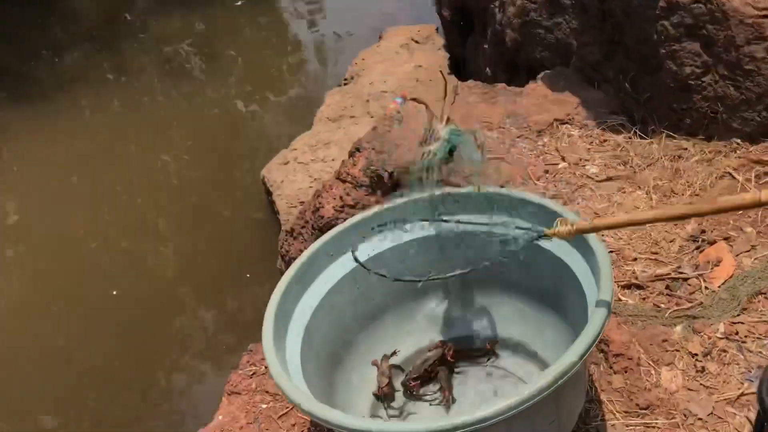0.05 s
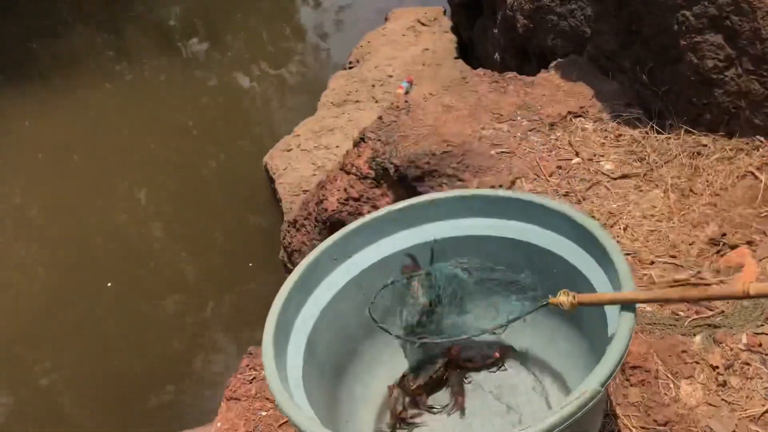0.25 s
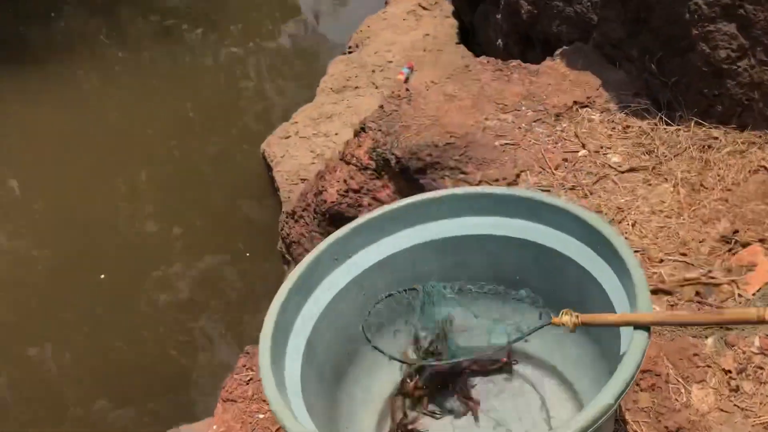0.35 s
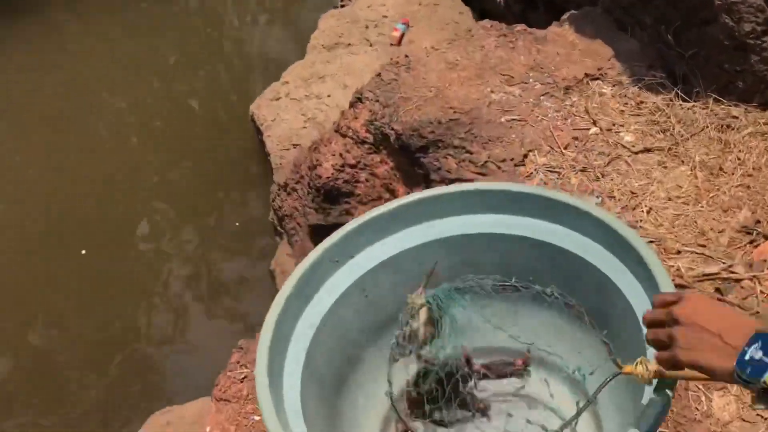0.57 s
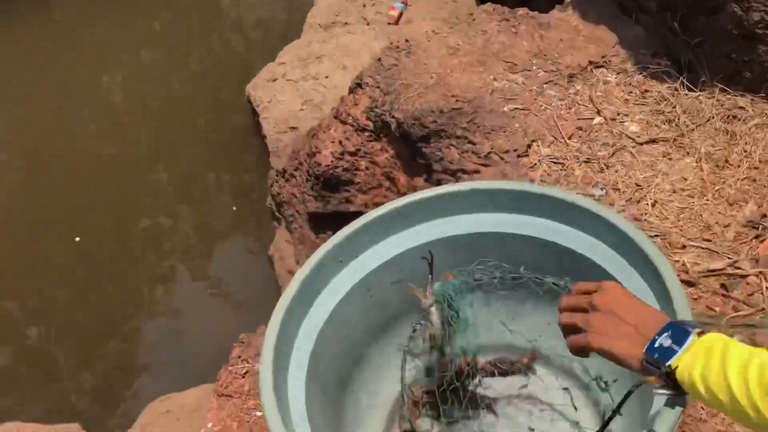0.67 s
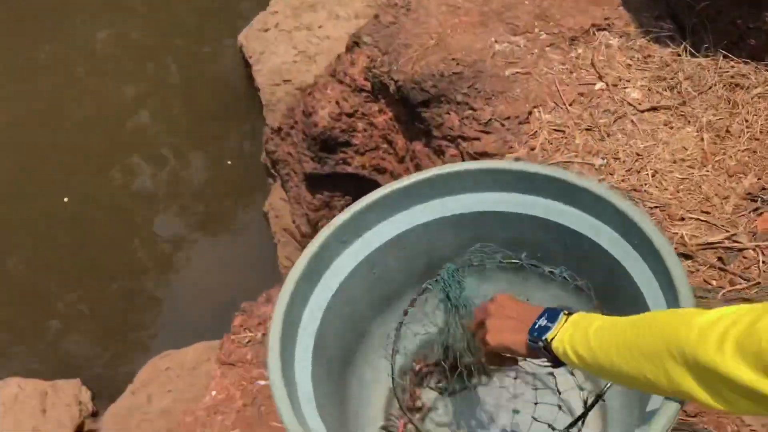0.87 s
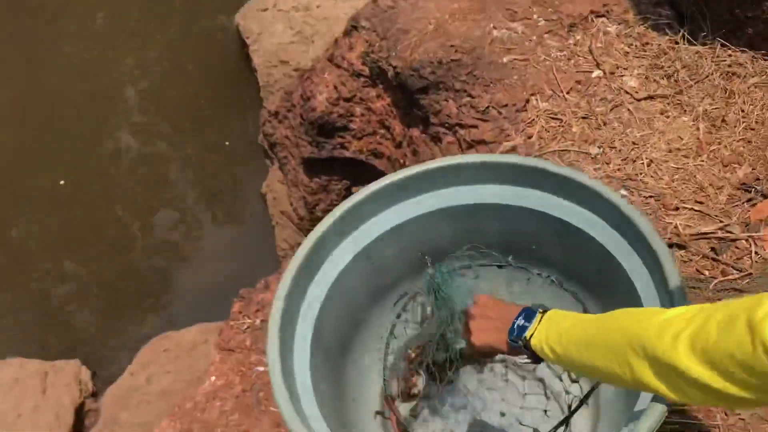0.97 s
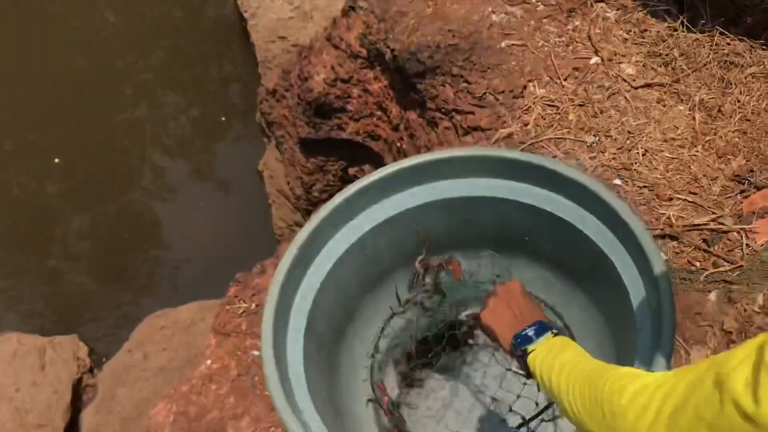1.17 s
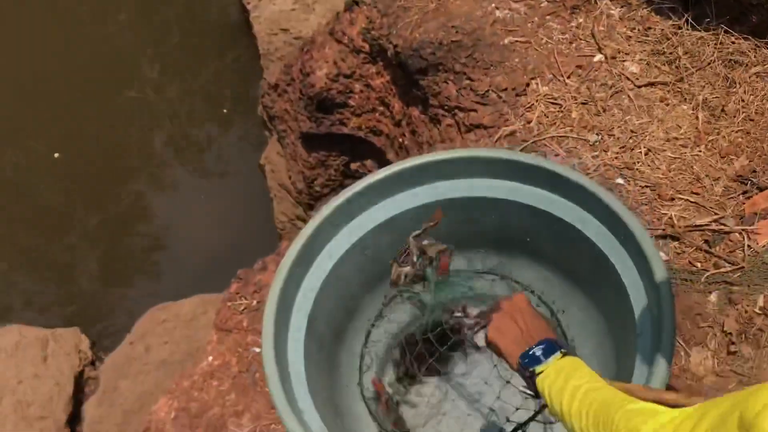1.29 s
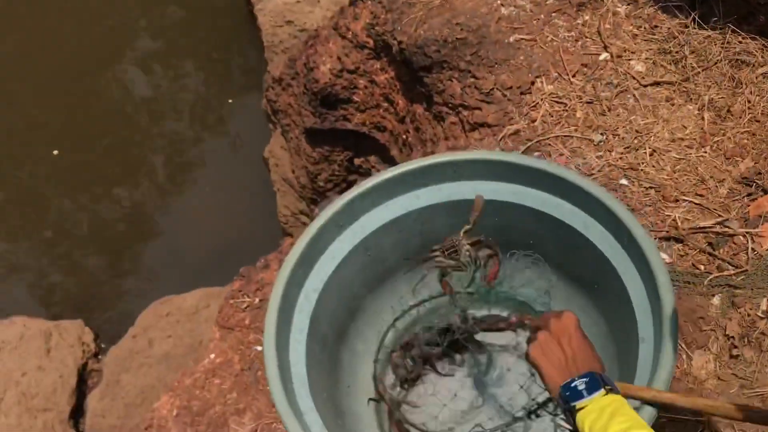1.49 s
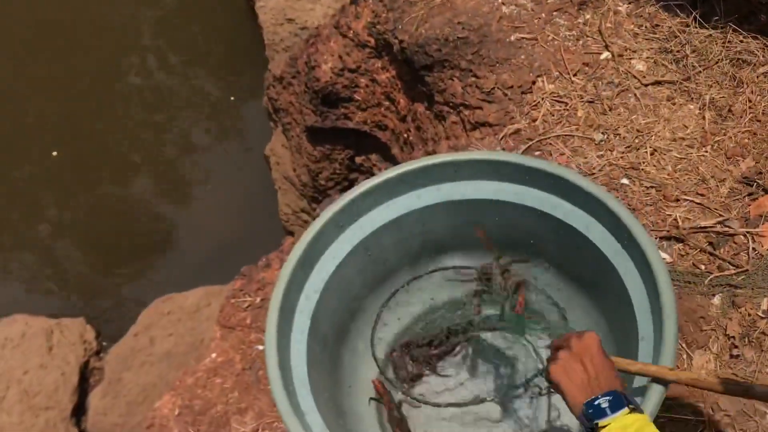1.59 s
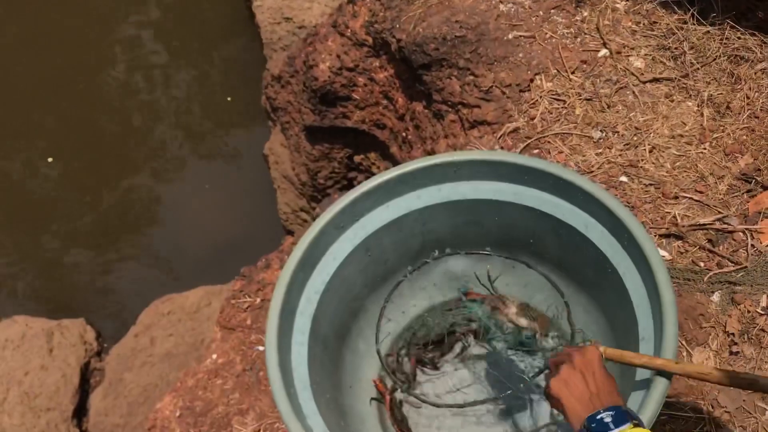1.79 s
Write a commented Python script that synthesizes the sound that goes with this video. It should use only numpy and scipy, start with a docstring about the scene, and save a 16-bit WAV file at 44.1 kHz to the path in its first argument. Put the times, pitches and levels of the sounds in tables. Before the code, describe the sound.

A net of crabs knocks into a plastic tub, then rattles as it is shaken.

```python
"""A quiet outdoor wash, a thin hiss of insects and a low hum lie over a creek bank throughout.
At 0.2 s a wire-hooped net of crabs drops into a plastic tub: the impacts excite the modes of floor,
wall and hoop. As these decay, shells and claws click and the mesh rustles by friction.
From about 1.1 s a hand shakes the crabs loose, with more knocks, clicks and short scrapes."""
import sys
import numpy as np
from scipy import signal
from scipy.fft import rfft, irfft
from scipy.io import wavfile
from scipy.ndimage import uniform_filter1d

SR = 44100
rng = np.random.default_rng(int(sys.argv[2]) if len(sys.argv) > 2 else 0)


def store_wav(level_fs):
    """Save 16-bit WAV to argv[1]."""
    pcm = np.round(np.clip(np.atleast_2d(level_fs), -1, 1) * 32767)
    wavfile.write(sys.argv[1], SR, pcm.T.astype(np.int16))


N = 81585
T = np.arange(SR // 2) / SR  # time within one event, t/s

# Spectrum of the outdoor wash: f/Hz, relative level/dB
WASH_SPECTRUM = [(20, -38), (35, -11), (55, -1), (100, 1), (170, -2), (280, -2.5), (420, -23), (640, -6),
                 (900, -21), (1800, -19.5), (3500, -17.5), (5800, -17), (9000, -20.5), (12000, -25),
                 (16000, -24)]
# Envelope of the low hum: t/s, level/dB
HUM_ENVELOPE = [(0, -60.5), (.5, -56), (.9, -55.5), (1.2, -59), (1.85, -56.5)]
# Envelope of the rubbing of mesh and legs: t/s, level/dB
RUSTLE_ENVELOPE = [(0, -55.5), (.14, -68), (.18, -49.5), (.23, -40), (.33, -42.5), (.40, -53.5),
                   (.47, -51.5), (.60, -53.5), (.68, -55.5), (.88, -60.5), (1.05, -60.5), (1.08, -50),
                   (1.11, -52), (1.15, -52.5), (1.24, -51), (1.29, -42), (1.35, -43.5), (1.44, -47),
                   (1.48, -53), (1.62, -55.5), (1.69, -49.5), (1.73, -49.5), (1.85, -57)]
# Spectrum of that rubbing: f/Hz, relative level/dB
RUSTLE_SPECTRUM = [(30, -45), (100, -5), (300, 2), (900, 2), (1700, 0.5), (3000, -4.5), (5000, -7.5),
                   (8000, -14.5), (12000, -14.5), (16000, -8.5)]
# Short slides: t/s, duration/s, level/dB, centre f/Hz, width/octaves
SCRAPES = [(.148, 0.028, -48, 1590, 0.9), (0.661, 0.029, -51, 6960, 1.3), (.712, 0.049, -53.5, 1880, 1.24),
           (1.068, 0.024, -49.5, 2980, 1.3), (1.300, .016, -47, 11000, 0.81),
           (1.330, 0.039, -56, 7100, 2.1), (1.432, 0.022, -45.5, 5500, 0.65),
           (1.515, 0.057, -53, 1070, 0.37), (1.625, 0.023, -56.5, 3200, 0.16),
           (1.670, 0.042, -46, 2000, 0.79), (1.738, 0.023, -48, 1670, 0.36),
           (1.762, 0.011, -59, 13000, 0.44)]
# Claws, shells and snagging mesh: t/s, level/dB, snap T60/s, shell f/Hz, shell level re snap/dB
CLICKS = [(0.012, -45, 0.0049, 3630, 5.5), (0.156, -32, 0.028, 1770, -7), (0.285, -20, .008, 3780, -1),
          (.4298, -33.5, 0.016, 5260, -5.5), (0.466, -40, 0.019, 3520, -7.5), (.485, -51, .01, 3840, -3),
          (0.5242, -50.5, 0.0066, 3350, 14.5), (0.563, -40.5, .01, 5140, -11), (.591, -48, 0.012, 2000, -7),
          (0.66, -44.5, 0.036, 5130, -4), (.718, -52, .012, 2100, 0), (0.745, -44, 0.019, 2500, -5),
          (0.825, -47, 0.013, 2000, -5), (1.1303, -28.5, 0.01, 2450, -16), (1.1368, -28, 0.013, 5200, -33),
          (1.1466, -30, 0.024, 2300, -6), (1.174, -36, .008, 4460, -11), (1.219, -40.5, .012, 4300, -3),
          (1.271, -34.5, .012, 4200, -7), (1.2733, -17.5, 0.0076, 4070, -14),
          (1.2805, -30, 0.012, 4000, -9), (1.2965, -31.5, 0.01, 3480, -24), (1.304, -44, .025, 3000, -18),
          (1.3327, -39.5, 0.0072, 3200, 0), (1.399, -45.5, 0.0066, 4940, 8), (1.425, -45, 0.006, 2950, -9),
          (1.443, -37, 0.017, 4850, 6.5), (1.650, -40.5, .016, 5000, -3.5),
          (1.7031, -23.5, 0.0076, 3870, -7), (1.7074, -36.5, .014, 4640, -3),
          (1.7162, -37, 0.012, 3470, -19), (1.804, -45, 0.011, 2720, 6.5)]
# Spectrum of a click's snap: f/Hz, relative level/dB
SNAP_SPECTRUM = [(60, -48), (400, -20), (1500, -10), (4000, -5.5), (7500, -3), (8700, -6), (10200, 2),
                 (11600, -6), (13000, -0.5), (16000, 0.5)]
# Hard contacts of hoop and shells with the plastic: t/s, level/dB, crack T60/s
CLATTERS = [(.1979, -24.5, 0.015), (0.2015, -22.5, 0.038), (0.205, -19, 0.014), (.213, -47, 0.023),
            (0.2198, -22.5, 0.031), (.229, -32, .03), (0.237, -31.5, .04), (.256, -28, 0.028),
            (0.281, -24.5, 0.014), (0.2858, -24.5, 0.043), (0.3081, -29.5, 0.053), (0.323, -41, .04),
            (.340, -36.5, 0.084), (.349, -44, 0.029), (1.144, -29.5, 0.0052), (1.1593, -28.5, 0.035),
            (1.362, -39, 0.032), (1.3716, -32.5, 0.0091), (1.566, -42, 0.022)]
# Spectrum of the tub's dense upper modes: f/Hz, relative level/dB
CRACK_SPECTRUM = [(40, -47), (200, -14), (700, 4.5), (1300, 6), (2100, 3), (2800, -1.5), (3500, -2),
                  (4900, -4), (6000, -11), (10000, -17.5), (16000, -19.5)]
# Modes of the wire hoop, the tub's floor and its wall: f/Hz, relative level/dB, T60/s
HOOP_MODES = [(1630, 0, 0.06), (1758, -3.5, 0.061), (1888, -1.5, .08), (2060, -5, 0.044), (2406, 2, 0.04),
              (3157, 2.5, 0.03), (3630, -7.5, 0.071), (3910, -1, 0.027), (4733, -12, 0.04),
              (4850, -3.5, 0.084)]
FLOOR_MODES = [(76.5, -11.5, 0.27), (112, -13.5, 0.096), (133, -6, 0.089), (164.5, 0, 0.12),
               (194, -12, 0.17), (252, -4, 0.17), (271.6, -5.5, 0.1), (345.5, -7, 0.14)]
WALL_MODES = [(465, -7, 0.19), (527.5, -4, 0.15), (609.6, 6, 0.13), (672, 7.5, 0.044), (712.5, -14, 0.3),
              (864, -26, 0.033), (929, -6.5, 0.17), (1035, 1, 0.071), (1214, 0.5, 0.07),
              (1275, -3.5, 0.099)]
# Blows on the tub, levels re KNOCK_DB: t/s, floor thud level/dB, thud centre f/Hz,
# wall clack level/dB, clack f/Hz, clack T60/s, wall ring level/dB
KNOCKS = [(0.2014, -18, 142, -13.5, 700, .017, -25), (0.2041, -16, 153, -15, 191, 0.023, -33),
          (0.2217, -31, 283, -16.5, 598, 0.021, -25), (.238, -42, 200, -37, 760, 0.019, -35),
          (.257, -34.5, 202, -24.5, 873, 0.035, -34), (0.268, -42, 200, -27, 1080, 0.033, -50),
          (0.286, -37, 178, -35, 1120, 0.012, -26), (0.3085, -58, 160, -28.5, 1040, 0.03, -48),
          (.3265, -38, 250, -26.5, 640, 0.034, -56), (0.337, -24, 246, -24, 740, 0.03, -28.5),
          (.349, -29, 290, -20, 716, 0.036, -35.5), (0.3898, -41, 250, -29.5, 620, 0.039, -55),
          (0.449, -31, 274, -48, 605, 0.069, -44), (1.075, -50, 200, -47.5, 454, 0.1, -59),
          (1.148, -57, 200, -32, 996, 0.028, -67), (1.162, -20.5, 170, -15, 802, 0.033, -32),
          (1.1708, -30.5, 193, -15.5, 659, 0.051, -41), (1.2121, -42, 250, -31, 770, 0.066, -43),
          (1.274, -38, 233, -33, 770, 0.031, -48), (1.287, -32.5, 225, -44, 746, 0.054, -51),
          (1.3208, -37, 248, -28, 860, 0.01, -48), (1.3385, -36.5, 245, -26, 825, 0.019, -48),
          (1.345, -36, 260, -25.5, 740, .03, -50), (1.3634, -62, 270, -36, 955, 0.049, -45),
          (1.371, -32, 260, -15, 863, 0.0088, -36), (1.380, -37.5, 263, -23.5, 787, 0.014, -43),
          (1.409, -36, 172, -43, 720, .04, -57), (1.447, -40, 190, -45, 700, .03, -72),
          (1.568, -24.5, 157, -17, 764, 0.025, -36.5), (1.6434, -42, 169, -32.5, 890, .025, -56),
          (1.692, -37.5, 179, -32.5, 860, 0.019, -54), (1.752, -55, 200, -41, 1390, 0.02, -48),
          (1.7844, -37.5, 153, -35, 760, 0.016, -59), (1.813, -45.5, 210, -25.5, 719, 0.03, -56)]

WASH_DB, INSECT_DB, HOOP_DB, TUB_ECHO_DB = -58, -61.5, -14.5, -11
KNOCK_DB, CLACK_SCATTER_DB = -3, -8.5
THUD_RISE_S, CLACK_RISE_S, CLICK_RISE_S = 0.0029, 0.0018, 0.00057
STRIKE_SPREAD_DB, DETUNE = 1.5, 0.017  # random spread of each mode from blow to blow
GRAINS_PER_S, GRAIN_SPREAD_DB = 1600, 4.5
RASP_DEPTH, RASP_GRAIN_S = 0.27, 0.001
BASS_CUT_HZ, BAND_LIMIT_HZ = 48, 15850


def amp(db):
    """Amplitude ratio: a factor of ten for every 20 dB."""
    return 10 ** (np.asarray(db) / 20)


def unit(x):
    """Normalisation to rms 1."""
    return x / np.sqrt(np.mean(x ** 2) + 1e-20)


def add(mix, start_s, sound):
    """Superposition: a sound adds linearly to the mix from its start time."""
    part = mix[max(round(start_s * SR), 0):][:len(sound)]
    part += sound[:len(part)]


def envelope(points):
    """Amplitude envelope, interpolated in decibels between points of t/s, level/dB."""
    return amp(np.interp(np.arange(N) / SR, *np.transpose(points)))


def colour(x, spectrum):
    """Spectral shaping by a curve of f/Hz, level/dB; the result has rms 1."""
    corner_hz, db = np.transpose(spectrum)
    hz = np.fft.rfftfreq(len(x), 1 / SR)
    gain = amp(np.interp(np.log(hz + 1), np.log(corner_hz), db))
    return unit(irfft(rfft(x) * gain, len(x)))


def band(x, hz, octaves):
    """Band-pass filtering by a Gaussian in log frequency; the result has rms 1."""
    widths_away = np.log2((np.fft.rfftfreq(len(x), 1 / SR) + 1) / hz) / octaves
    return unit(irfft(rfft(x) * np.exp(-.5 * widths_away ** 2), len(x)))


def strike(rise, t60):
    """Damping after impact: a linear rise, then an exponential decay of 60 dB in t60 seconds."""
    return np.minimum(T / rise, 1) * np.exp(-np.log(1000) * np.maximum(T - rise, 0) / t60)


def ring(modes, rise, centre_hz, reach_oct=0.73):
    """Modal superposition: a blow excites damped sinusoids, favouring those near centre_hz."""
    out = np.zeros(len(T))
    for hz, db, t60 in modes:
        strength, tuning, phase = rng.standard_normal(3)
        coupling = 1 / (1 + (np.log2(hz / centre_hz) / reach_oct) ** 2)
        tone = np.sin(2 * np.pi * hz * (1 + DETUNE * tuning) * T + np.pi * phase)
        out += amp(db + STRIKE_SPREAD_DB * strength) * coupling * strike(rise, t60) * tone
    return out


def creek_bank():
    """Ambient noise: a broadband wash, a band of insects and a hum whose narrow band makes it waver."""
    wash = amp(WASH_DB) * colour(rng.standard_normal(N), WASH_SPECTRUM)
    insects = amp(INSECT_DB) * band(rng.standard_normal(N), hz=7060, octaves=0.16)
    hum = envelope(HUM_ENVELOPE) * band(rng.standard_normal(N), hz=70.94, octaves=0.033)
    return wash + insects + hum


def tub_echo(x):
    """Reverberation: brief, decaying reflections between the tub's walls join the direct sound."""
    taps = rng.standard_normal(len(T)) * (rng.random(len(T)) < .1)
    taps *= strike(rise=0.0012, t60=0.036)
    return x + amp(TUB_ECHO_DB) * signal.fftconvolve(x, taps / np.linalg.norm(taps))[:N]


def rustle():
    """Stick-slip friction: mesh and legs cross the plastic in tiny random slips of uneven size."""
    sizes = amp(GRAIN_SPREAD_DB * np.minimum(rng.exponential(1, N), 4))
    slips = rng.random(N) < GRAINS_PER_S / SR
    grains = signal.fftconvolve(sizes * slips, strike(CLICK_RISE_S, t60=0.0067))[:N]
    return envelope(RUSTLE_ENVELOPE) * colour(grains * rng.standard_normal(N), RUSTLE_SPECTRUM)


def scrapes():
    """Sliding friction: uneven grip modulates a band of noise that swells and fades."""
    out = np.zeros(N)
    for start_s, duration, db, hz, octaves in SCRAPES:
        roughness = uniform_filter1d(rng.standard_normal(len(T)), round(RASP_GRAIN_S * SR))
        grip = unit(np.exp(RASP_DEPTH * unit(roughness)))
        swell = np.sin(np.pi * np.minimum(T / duration, 1))
        hiss = band(rng.standard_normal(len(T)), hz, octaves)
        add(out, start_s, amp(db) * swell * grip * hiss)
    return out


def clicks():
    """Impulsive excitation: a broadband snap with the brief resonance of a small shell."""
    out = np.zeros(N)
    for start_s, db, t60, hz, shell_db in CLICKS:
        snap = colour(rng.standard_normal(len(T)), SNAP_SPECTRUM) * strike(CLICK_RISE_S, t60)
        shell = band(rng.standard_normal(len(T)), hz, octaves=.16) * strike(CLICK_RISE_S, t60=0.0099)
        add(out, start_s, amp(db) * (snap + amp(shell_db) * shell))
    return out


def clatters():
    """Modal overlap: on hard contact the tub's upper modes merge into a crack, while the hoop rings."""
    out = np.zeros(N)
    for start_s, db, t60 in CLATTERS:
        crack = colour(rng.standard_normal(len(T)), CRACK_SPECTRUM) * strike(CLICK_RISE_S, t60)
        hoop = ring(HOOP_MODES, CLICK_RISE_S, centre_hz=2780, reach_oct=0.96)
        add(out, start_s, amp(db) * (crack + amp(HOOP_DB) * hoop))
    return out


def knocks():
    """Plate vibration: each blow bends the floor, clacks on the damped plastic and rings the wall."""
    out = np.zeros(N)
    for start_s, thud_db, thud_hz, clack_db, clack_hz, t60, wall_db in KNOCKS:
        scatter = amp(CLACK_SCATTER_DB) * band(rng.standard_normal(len(T)), clack_hz, octaves=.55)
        tone = np.sin(2 * np.pi * clack_hz * T)
        clack = amp(clack_db) * (tone + scatter) * strike(CLACK_RISE_S, t60)
        thud = amp(thud_db) * ring(FLOOR_MODES, THUD_RISE_S, thud_hz)
        wall = amp(wall_db) * ring(WALL_MODES, CLACK_RISE_S, clack_hz)
        add(out, start_s, thud + clack + wall)
    return amp(KNOCK_DB) * out


def scene():
    """Superposition in one channel: knocks, lighter contacts echoing in the tub, and the creek bank."""
    blows = knocks()
    contacts = clatters() + clicks() + scrapes() + rustle()
    return (blows + tub_echo(contacts) + creek_bank())[None]


def record(dry):
    """Band limiting: the microphone rolls off the bass and a low-pass removes the highest treble."""
    highpass = signal.butter(4, BASS_CUT_HZ, "highpass", fs=SR, output="sos")
    lowpass = signal.firwin(511, BAND_LIMIT_HZ, window=("kaiser", 9), fs=SR)
    return signal.oaconvolve(signal.sosfilt(highpass, dry), lowpass[None], "same")


dry = scene()
out = record(dry)
store_wav(out)
```